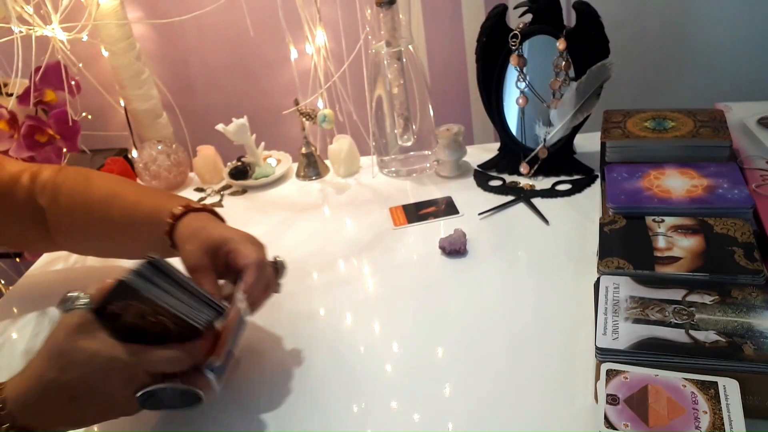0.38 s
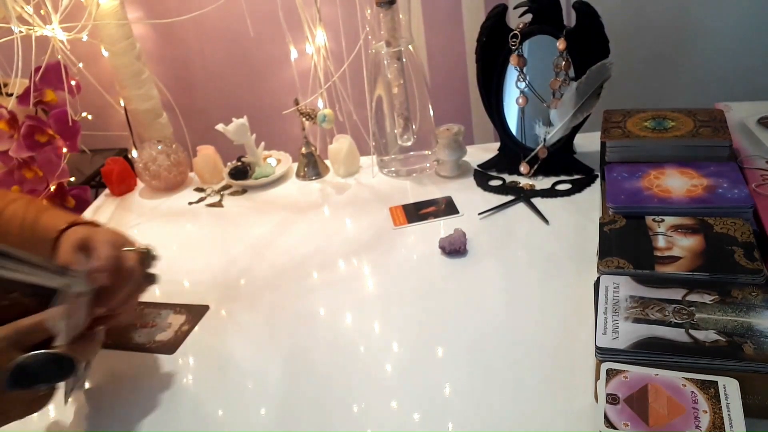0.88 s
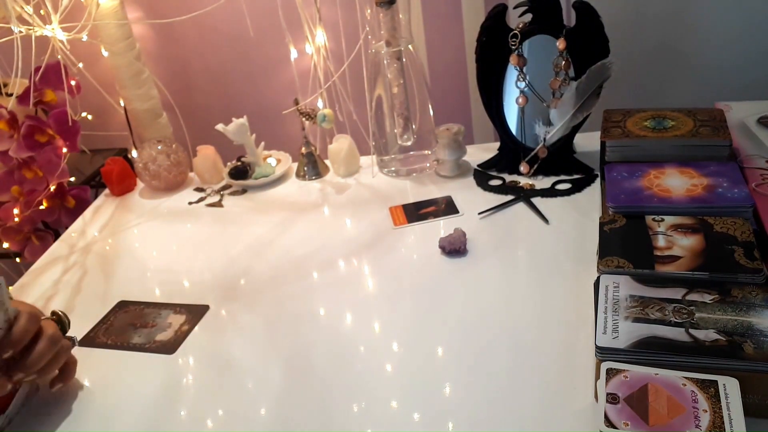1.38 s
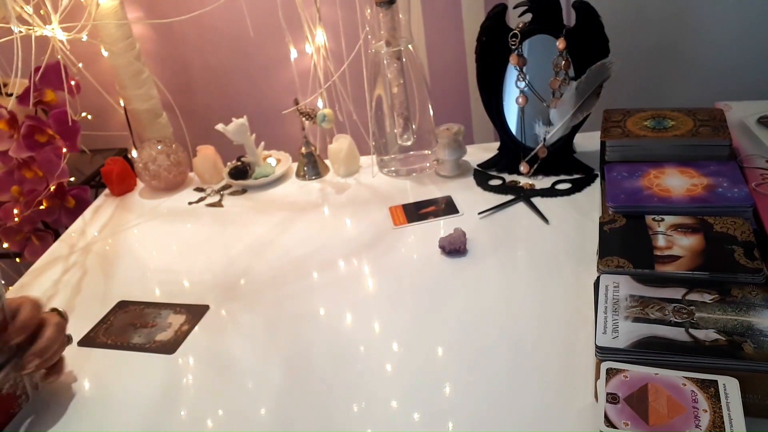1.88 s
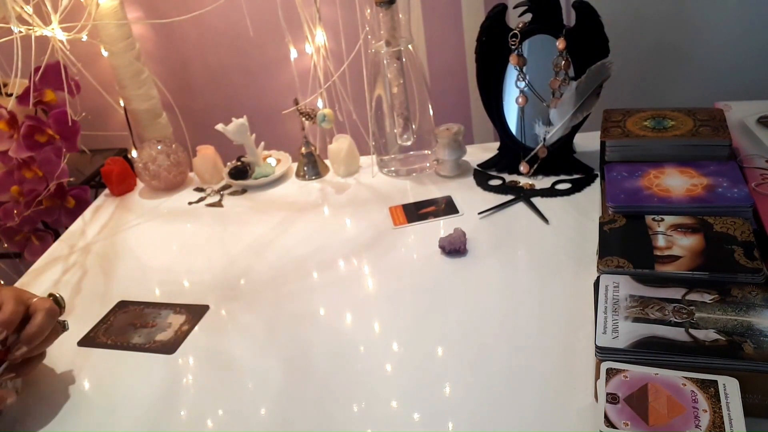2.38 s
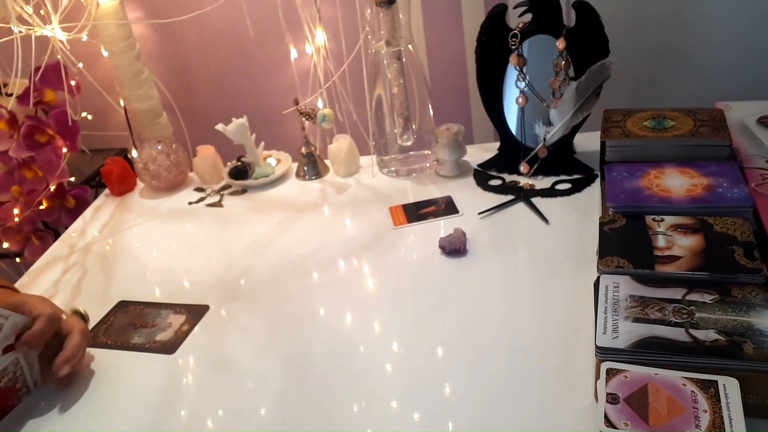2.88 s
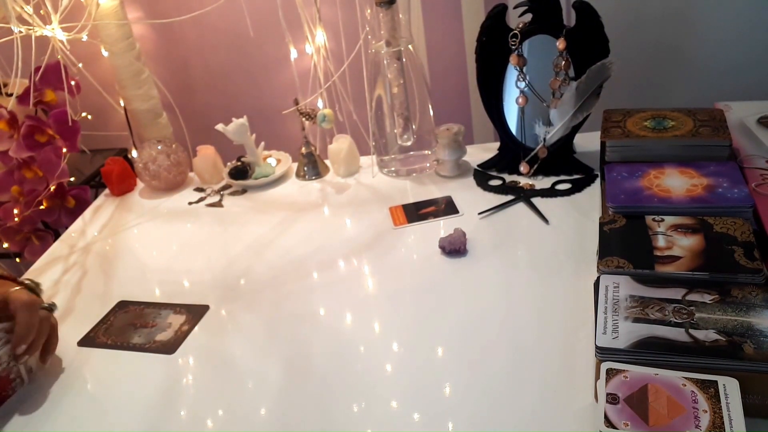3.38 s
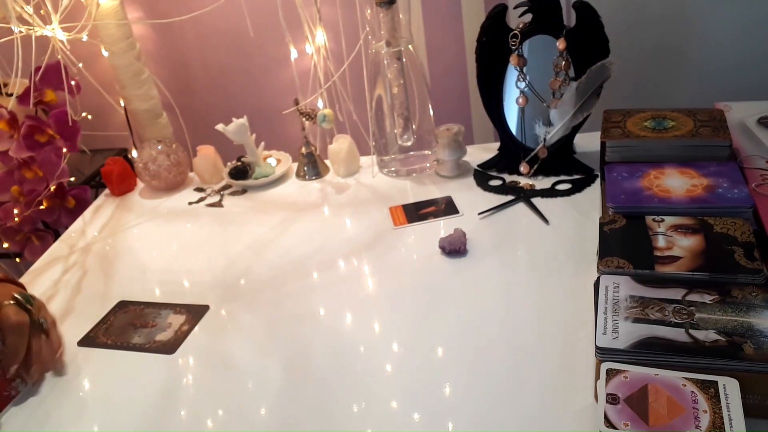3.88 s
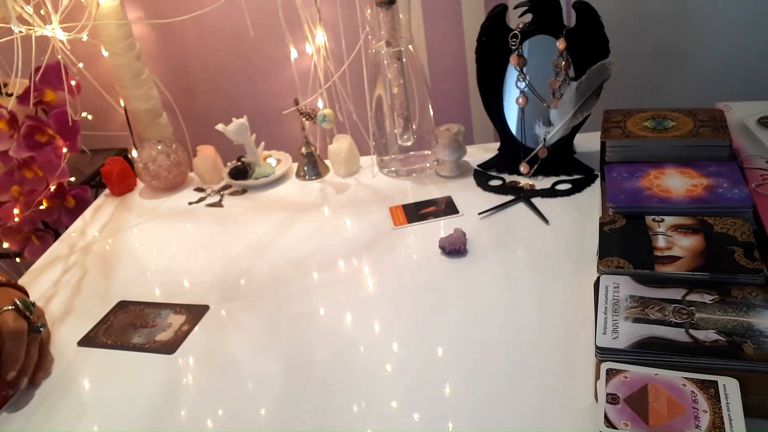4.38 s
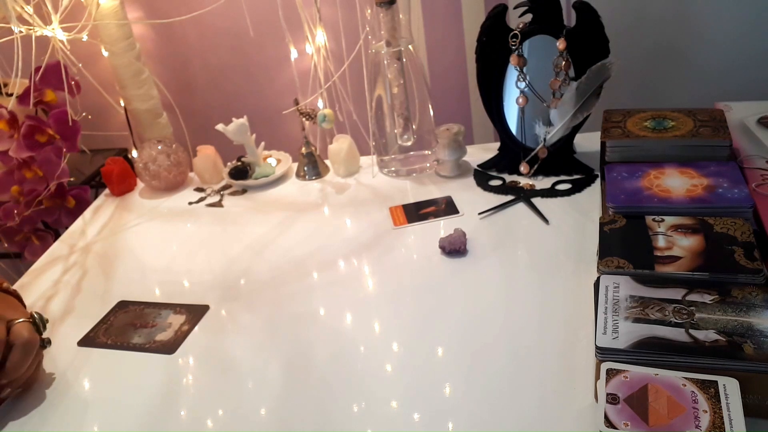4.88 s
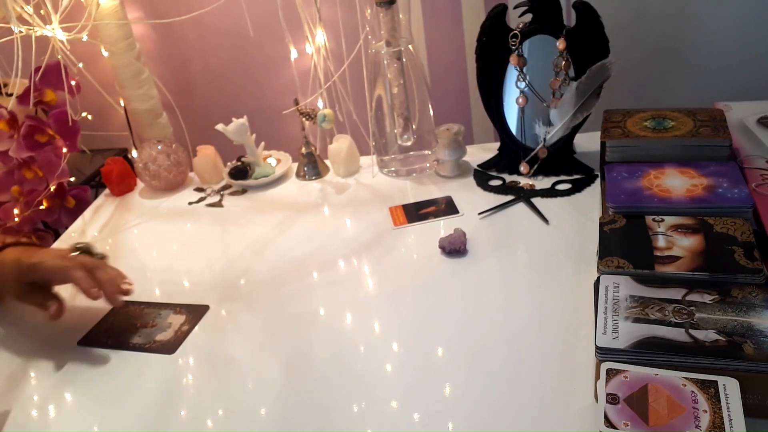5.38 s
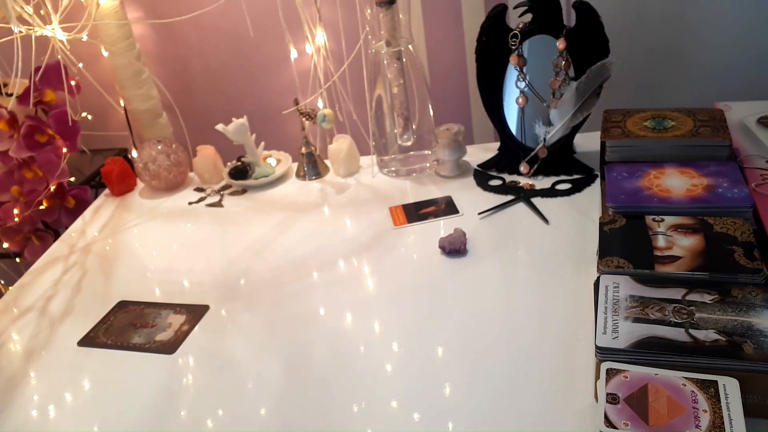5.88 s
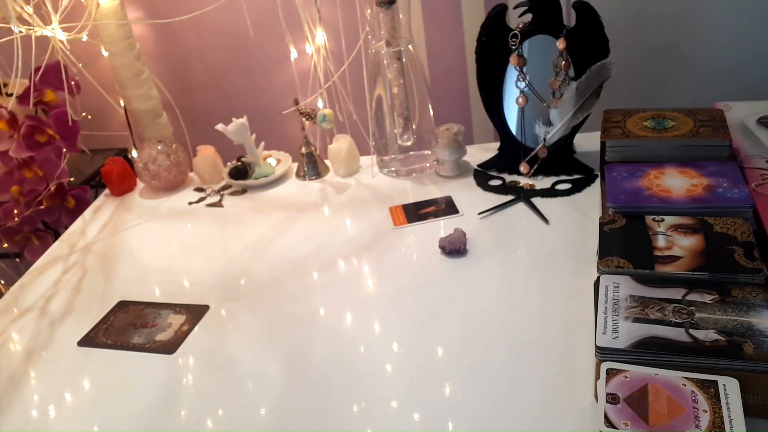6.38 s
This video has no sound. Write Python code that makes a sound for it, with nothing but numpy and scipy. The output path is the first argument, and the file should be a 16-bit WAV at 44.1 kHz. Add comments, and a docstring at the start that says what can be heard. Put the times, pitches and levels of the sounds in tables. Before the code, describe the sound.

Close to a stereo microphone on a table, hands handle stiff cards in a small hard room. After faint slides and ticks, a burst of loud, bright snaps comes between one and two seconds, then lighter clicks, a quick airy swish, and a very hard double slap just after four seconds. Afterwards only faint brushing over low rumble and distant hum.

```python
"""In a small hard room, hands square, snap and slide stiff cards at the right of a stereo recorder on a table.
Each snap is an impulse ringing card-edge resonances, bounced off the table top and sent through a noise tail.
Card slides and rushes of noise are clumped grains, the air slot between cards is a breathy falling tone,
and wrists bump decaying table modes.
Behind them a distant machine hums in wavering sines over shaped-noise room rumble and microphone hiss."""
import sys
import numpy as np
from scipy import signal
from scipy.fft import rfft, irfft, next_fast_len
from scipy.io import wavfile
from scipy.ndimage import uniform_filter1d, map_coordinates

SR = 44100
rng = np.random.default_rng(int(sys.argv[2]) if len(sys.argv) > 2 else 0)


def transcribe(u):
    """Save the signal u as a 16-bit wav file named by the first command-line argument.

    u: samples, shape (n,) or (channels, n), limited to [-1, 1]; the rate is SR.
    q: integer samples, one column per channel.
    """
    v = np.clip(np.atleast_2d(u).T, -1, 1)
    q = np.round(v * 32767).astype(np.int16)
    wavfile.write(sys.argv[1], SR, q)


def undo_db(level):
    """Turn decibels back into plain size, where 20 dB means ten times bigger."""
    steps = np.asarray(level, float) / 20
    return 10 ** steps


N = 287311

# All source levels are taken before bounces, room and microphone colour.
# spectrum of room air and microphone, relative: [f/Hz, level/(dB per Hz)]
AIR_SPECTRUM = [(12, -16.5), (30, -18.5), (60, -9.5), (100, -5), (130, -2.5), (170, -9), (230, -14.5),
                (600, -15.5), (2000, -19), (5000, -29), (7200, -29.5), (8600, -32), (12000, -30),
                (15900, -28), (16300, -69)]
# rumble level, before its slow lumps: [t/s, level/dB]
RUMBLE_LEVEL = [(0, -60.5), (.7, -62.5), (1.4, -60), (3.4, -59.5), (4.07, -61.5), (4.9, -60.5), (6.5, -64)]
# orders of the distant machine: [f/Hz, mean level/dB rms]
MACHINE_ORDERS = [(58, -72), (116, -69), (174, -66.5), (232, -86.5), (290, -69.5), (463, -91.5)]
# wrists and deck bumping the table top: [t/s, level/dB]
BUMPS = [(0, -47.5), (0.079, -54), (0.258, -48), (1.323, -46), (1.904, -48), (2.174, -48), (2.463, -55.5),
         (2.814, -43.5), (2.851, -45), (3.261, -46.5), (4.19, -43), (4.791, -53), (4.968, -52.5)]
# table top modes: [f/Hz, relative level/dB, T60/s]
TABLE_MODES = [(95.7, -5.5, .35), (126.7, 0, 0.518), (195, -6, 0.17)]
# air slots between parting cards: [t/s at full level, hold/s, level/dB, f/Hz at full level, sag/(Hz per s)]
SLOTS = [(3.264, 0.031, -37, 1100, 10920), (3.708, 0.01, -42.5, 1042, 1980),
         (3.754, 0.017, -62.5, 960, 200), (3.836, 0.026, -48, 875.5, 296), (4.825, .02, -62.5, 645, 300)]
# overtones of the air slot: [multiple, relative level/dB]
SLOT_OVERTONES = [(1, 0), (2, -7)]
# card slides and rushes of noise: [t/s at full level, swell/s, hold/s, level/dB, brightness/(dB per octave)];
# the first is the tail of an earlier hit, the one at 4.212 s thickens the ring of the snaps before it
RUSHES = [(0.002, 0.0017, 0.022, -43, 5.5), (0.067, 0.073, .06, -44.5, 9.5), (0.247, .015, 0.028, -53, 4.5),
          (0.421, 0.089, 0.016, -58, 8), (1.336, 0.052, 0.064, -34, 1), (1.887, 0.056, 0.11, -40, -2.5),
          (2.172, 0.09, 0.039, -56.5, 3), (2.777, 0.11, 0.025, -50.5, -6.5),
          (2.871, 0.055, 0.089, -52, -6.5), (3.225, 0.044, .03, -42.5, -2.5),
          (3.279, .03, 0.019, -26, -3.5), (3.309, .03, 0.012, -24, -1.5), (3.601, 0.036, 0.082, -60, -4.5),
          (3.733, 0.045, 0.028, -47, -6), (3.785, .03, 0.045, -49, -6), (3.86, .04, 0.053, -50, -7.5),
          (4.212, 0.041, 0.051, -24.5, 3.5), (4.83, 0.04, .03, -66, -14), (5.854, 0.045, 0.059, -54, 11),
          (6.189, .04, .005, -47, 10.5)]
# spectrum of slides and rushes, relative: [f/Hz, level/(dB per Hz)]
RUSH_SPECTRUM = [(200, -35.5), (450, -28), (900, -4.5), (1500, -1.5), (2500, 3.5), (4000, -0.5), (6000, -8),
                 (9000, -10.5), (15500, -10)]
# card edges snapping: [t/s, crack peak level/dB, deck knock relative to crack/dB,
#                       brightness/(dB per octave), left over right/dB]
SNAPS = [(0.2363, -32, -7, 8.5, -20), (0.2609, -31.5, -11, 10, -19), (1.2923, -29.5, -8, 5, -7),
         (1.3205, -5.5, -10, 3, -0.5), (1.3777, -18, -37, -5.5, 3), (1.5376, -1, -20, 6.5, -2),
         (1.739, -31.5, -19, 0.5, 2), (1.845, -18.5, -37, -2.5, -6.5), (1.8983, -21.5, 1.5, 8, -0.5),
         (1.9047, -3.5, -35, 2, 3), (2.0831, -33, -3.5, 6, -6), (2.15, -29.5, -15, 8, -7),
         (2.1647, -31.5, -12, 6, -5), (2.1709, -28, -7.5, 25, -7), (2.2852, -20.5, -4, 3.5, -9),
         (2.765, -40, -9, 13, -7), (2.812, -42, -13, 7, -10), (2.8305, -37, -1, 7, -3),
         (2.846, -20.5, -14, -0.5, -9), (3.1884, -34, -4, 4.5, -3), (3.204, -23, -8.5, 0, -1.5),
         (3.5819, -36.5, -20, -6.5, -4), (3.7777, -23, -36, -31, -6), (3.88, -26, -28, -2, -5),
         (3.9042, -33, -34, 2, -6), (4.1749, -29, -37, 3, 0), (4.1781, -23, -1, 1, -10),
         (4.1863, -1, -13, 3.5, -5.5), (4.2061, -4, -8.5, 3.5, 1)]
# soft taps of the hand on the deck: [t/s, level/dB before softening]
TAPS = [(1.3023, -23.5), (1.3125, -28), (3.7024, -31), (3.7569, -30), (4.825, -41), (4.975, -60)]
# card edge resonances, before bend and brightness: [f/Hz, width/Hz, level/dB]
CARD_EDGE = [(2250, 1400, 2.5), (4540, 2260, 4.5), (6770, 5600, -2.5), (12800, 1900, -3.5)]
# deck and hand resonances: [f/Hz, width/Hz, level/dB]
DECK = [(301.7, 340, -1.5), (547, 1300, 0.5), (1180, 1590, 0.5)]
# bounces off the table and nearby things, later ones mostly duller: [mean lag t/s, centre f/Hz, level/dB]
BOUNCES = [(.0006, 5600, -1.5), (.0015, 4590, -0.5), (.0022, 3490, -3), (.003, 2700, 1),
           (.0048, 7000, -19.5), (.009, 2353, -11.5)]
# decay of the room: [f/Hz, T60/s]
ROOM_T60 = [(200, 0.224), (530, 0.35), (1400, 0.37), (3700, 0.38), (7000, 0.4), (12000, 0.26)]
# colour of the room tail: [f/Hz, level/dB]
ROOM_COLOUR = [(200, 11), (700, 0), (1700, 0.5), (2800, -1.5), (4500, -6), (7000, -10.5), (12000, 1.5)]
# colour of the microphone on the card sounds: [f/Hz, level/dB]
MICROPHONE = [(40, -21), (110, -6.5), (300, 3), (6000, 2.5), (7300, 8), (8400, -6.5), (15000, -24),
              (16800, -41.5)]

SPACING_M, SOUND_SPEED_M_PER_S = 0.14, 343  # microphone pair
LEFT_LAG_S = 0.00018
AIR_HISS_DB = -69.5  # rms between 9 and 15 kHz
SLOT_SWELL_S, SLOT_FADE_DB_PER_S, SLOT_LOWEST_HZ = 0.0099, 502, 653
SWELL_DB, RUSH_FADE_DB_PER_S = 23.5, 1099.5
TAP_PAN_DB, BLOW_ROOM_DB = -2, 24.5
TOP_HZ = 16700


def unit(x):
    """Scale to rms 1."""
    return x / np.sqrt(np.mean(x ** 2) + 1e-20)


def along(points, hz):
    """Read a curve of (Hz, value) points on a log frequency axis."""
    f, v = np.transpose(points)
    return np.interp(np.log(hz + 1), np.log(f + 1), v)


def wobble(rate):
    """A smooth random curve with rate knots a second."""
    knots = rng.standard_normal(int(N * rate / SR) + 4)
    return map_coordinates(knots, [np.arange(N) * rate / SR])


def filtered(x, response):
    """Shape x by a complex response of frequency."""
    m = next_fast_len(x.shape[-1] + 4096)
    spectrum = rfft(x, m) * response(np.fft.rfftfreq(m, 1 / SR))
    return irfft(spectrum, m)[..., :x.shape[-1]]


def resonances(modes, f):
    """Causal sum of (Hz, width Hz, dB) resonances with alternating signs."""
    total = 0
    for k, (centre, width, db) in enumerate(modes):
        damping = 1j * f * width
        total = total + (-1) ** k * undo_db(db) * damping / (centre ** 2 - f ** 2 + damping)
    return total


def diffuse(pair, alike):
    """Make two noises as alike as a spaced microphone pair hears sound from all sides."""
    def spread(hz):
        likeness = np.clip(alike, 0, 1) * np.sinc(2 * hz * SPACING_M / SOUND_SPEED_M_PER_S)
        turn = np.arccos(likeness) / 2
        return np.array([np.cos(turn), np.sin(turn)])
    mid, side = filtered(pair, spread)
    return np.array([mid + side, mid - side])


def direct(x, pan_db):
    """Sound from the right reaches the left microphone later."""
    return filtered(x * undo_db([[pan_db], [0]]), lambda hz: np.exp(-2j * np.pi * hz * [[LEFT_LAG_S], [0]]))


def room(x):
    """A fresh diffuse tail builds up over some milliseconds, then each frequency dies at its own speed."""
    hz, t, grid = signal.stft(rng.standard_normal((2, SR // 5 * 2)), SR, nperseg=256)
    decay_db = 60 * t / along(ROOM_T60, hz)[:, None]
    grid = grid * undo_db(along(ROOM_COLOUR, hz)[:, None] - decay_db)
    tail = signal.istft(grid, SR, nperseg=256)[1]
    build_up = 1 - np.exp(-np.arange(tail.shape[1]) / SR / 0.0041)
    tail = diffuse(tail * build_up, alike=0.85)
    return signal.fftconvolve(x[None], tail / np.sqrt(SR), axes=1)


def add(track, s, x):
    """Mix x into the track from time s."""
    part = track[:, round(s * SR):][:, :x.shape[1]]
    part += x[:, :part.shape[1]]


def stroke(swell_s, hold_s, fade_db_per_s):
    """Time from full level, and the gain of a stroke that swells, holds and fades."""
    t = np.arange(-abs(swell_s), abs(hold_s) + 40 / fade_db_per_s, 1 / SR)
    swell_db = SWELL_DB * np.minimum(t, 0) / abs(swell_s)
    fade_db = fade_db_per_s * np.maximum(t - hold_s, 0)
    return t, undo_db(swell_db - fade_db)


def heard(track, s, x, room_db):
    """Mix a swelling sound in, direct and through the room."""
    reverb = room(x)[:, :len(x)]
    add(track, s, direct(x, pan_db=-4.5) + undo_db(room_db) * reverb)


def struck(track, s, blow, pan_db):
    """Mix a blow in: direct, bounced off the table and nearby things, and through the room."""
    stray = undo_db(rng.normal(0, 0.7, (len(BOUNCES), 2, 1)))  # each path differs a little from ear to ear

    def echoes(f):
        total = 1.65  # direct sound
        for (lag, hz, level), k in zip(BOUNCES, stray):
            delay = np.exp(-2j * np.pi * f * lag * k)
            total = total + resonances([(hz, 0.64 * hz, level)], f) * delay
        return total
    add(track, s, filtered(direct(blow, pan_db), echoes))
    add(track, s, undo_db(BLOW_ROOM_DB) * room(blow))


def machine():
    """Sines waver in level, pitch and phase as the orders of a machine beyond the walls, left ear first."""
    drift = np.cumsum(1 + 0.0025 * wobble(1.5)) / SR - [[0], [0.0003]]
    hum = np.zeros((2, N))
    for hz, db in MACHINE_ORDERS:
        level = np.sqrt(2) * undo_db(db + 2.2 * wobble(3.03))
        hum += level * np.sin(2 * np.pi * hz * drift + 0.23 * wobble(13))
    return hum


def background():
    """Diffuse noise splits into low rumble with slow lumps and smooth hiss, under the machine hum."""
    noise = filtered(rng.standard_normal((2, N)), lambda f: undo_db(along(AIR_SPECTRUM, f)))
    air = diffuse(noise, alike=0.57)
    low = filtered(air, lambda f: 1 / (1 + (f / 250) ** 4))
    treble = filtered(air, lambda f: (f > 9000) & (f < 15000))
    level_db = np.interp(np.arange(N) / SR, *np.transpose(RUMBLE_LEVEL))
    rumble = undo_db(level_db + 1.4 * wobble(5.0)) * unit(low) * undo_db([[0.7], [-0.7]])
    hiss = undo_db(AIR_HISS_DB) * (air - low) / np.std(treble)
    return rumble + hiss + machine()


def bumps():
    """Soft blows set the table top booming briefly; the recorder stands on it."""
    track, t = np.zeros((2, N)), np.arange(SR // 2) / SR
    onset = 1 - np.exp(-t / 0.0065)
    for s, db in BUMPS:
        boom = np.zeros(len(t))
        for hz, level, t60 in TABLE_MODES:
            boom += undo_db(level + rng.normal(0, 1.5) - 60 * t / t60) * np.sin(2 * np.pi * hz * t)
        add(track, s, undo_db(db) * boom * onset * undo_db([[0.6], [-0.6]]))
    return track


def slots():
    """The slot of air rings like a short pipe, breathy, and drops in pitch as it opens."""
    track = np.zeros((2, N))
    for s, hold_s, db, full_hz, sag in SLOTS:
        t, gain = stroke(SLOT_SWELL_S, hold_s, SLOT_FADE_DB_PER_S)
        phase = 2 * np.pi * np.cumsum(np.maximum(full_hz - sag * t, SLOT_LOWEST_HZ)) / SR
        # slow noise on cosine and sine makes narrow noise around each overtone
        noise = rng.standard_normal((len(SLOT_OVERTONES), 2, SR // 2))[..., :len(t)]
        breath = unit(filtered(noise, lambda f: 1 / (1 + (f / 80) ** 2)))
        note = np.zeros(len(t))
        for (k, level), (a, b) in zip(SLOT_OVERTONES, breath):
            note += undo_db(level) * (a * np.cos(k * phase) + b * np.sin(k * phase))
        note = undo_db(db) * gain * unit(note)
        heard(track, s + t[0], np.pad(note, (0, SR // 2)), room_db=15.5)
    return track


def slides_and_rushes():
    """Hiss of clumped grains: card faces that catch and let go, and rushes of noise that fill out hits."""
    track = np.zeros((2, N))
    for s, swell_s, hold_s, db, tilt_db in RUSHES:
        t, gain = stroke(swell_s, hold_s, RUSH_FADE_DB_PER_S)
        white, clumps = rng.standard_normal((2, SR // 2))[:, :len(t)]
        grains = white * undo_db(2.6 * unit(uniform_filter1d(clumps, size=50)))

        def colour(f):
            return undo_db(along(RUSH_SPECTRUM, f) + tilt_db * np.log2((f + 1) / 3000))
        hiss = undo_db(db) * gain * unit(filtered(grains, colour))
        heard(track, max(s + t[0], 0), np.pad(hiss, (0, SR // 2)), room_db=14.5)
    return track


def snaps():
    """Each snap is one sharp flick that rings the card edge and knocks the deck; a tap only knocks the deck."""
    track, flick = np.zeros((2, N)), signal.unit_impulse(SR // 25)
    knock = filtered(flick, lambda f: resonances(DECK, f))
    knock = knock / np.abs(knock).max()
    for s, db, knock_db, tilt_db, pan_db in SNAPS:
        bend = undo_db(rng.normal(0, 0.4))  # no two cards bend alike
        edge = [(hz * bend, width, level + tilt_db * np.log2(hz / 4500)) for hz, width, level in CARD_EDGE]
        crack = filtered(flick, lambda f: resonances(edge, f))
        crack = crack / np.abs(crack).max()
        struck(track, s, undo_db(db) * (crack + undo_db(knock_db) * knock), pan_db)
    soft_knock = filtered(knock, lambda f: 1 / (1 + 1j * f / 2500) ** 2)
    for s, db in TAPS:
        struck(track, s, undo_db(db) * soft_knock, TAP_PAN_DB)
    return track


def scene():
    """Cards through the microphone's colour, over table bumps and background."""
    cards = snaps() + slides_and_rushes() + slots()
    return filtered(cards, lambda f: undo_db(along(MICROPHONE, f))) + bumps() + background()


def roll_off(x):
    """The treble ends steeply here."""
    return signal.sosfilt(signal.butter(12, 16880, fs=SR, output="sos"), x)


def record(dry):
    """The recorder clips at full scale, then cuts everything above its band limit."""
    clipped = np.clip(dry, -1, 1)
    mix = filtered(clipped, lambda f: f < TOP_HZ)
    return roll_off(mix)


dry = scene()
out = record(dry)
transcribe(out)
```